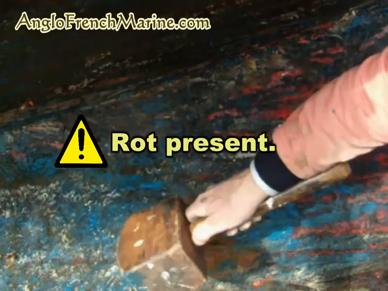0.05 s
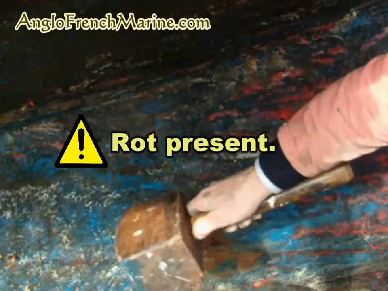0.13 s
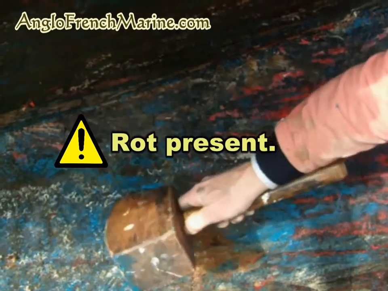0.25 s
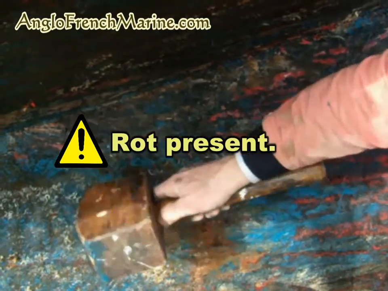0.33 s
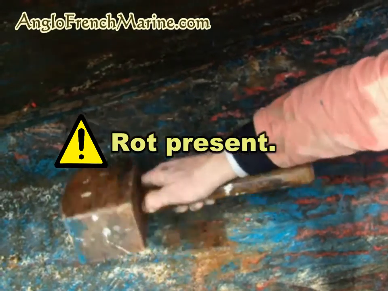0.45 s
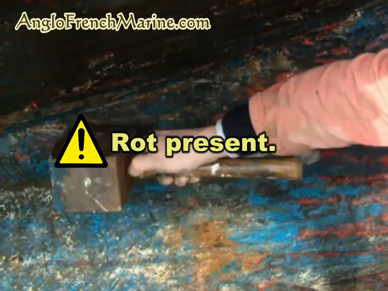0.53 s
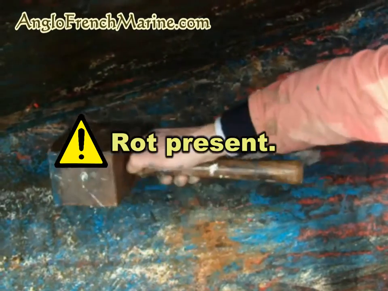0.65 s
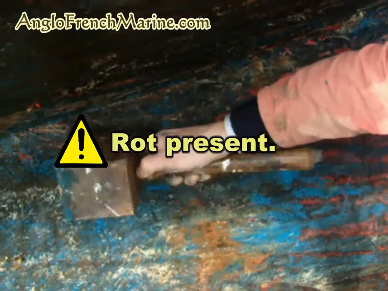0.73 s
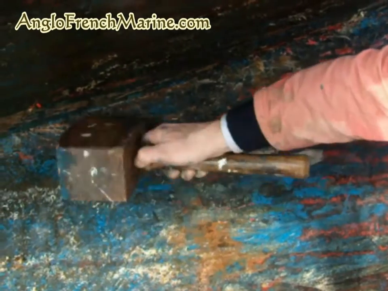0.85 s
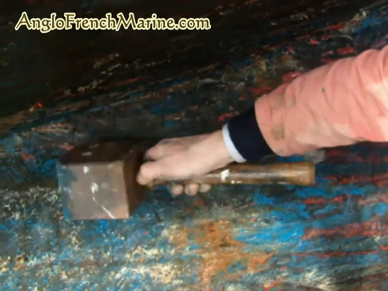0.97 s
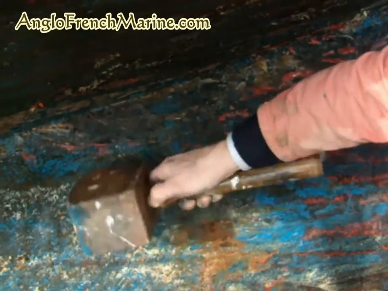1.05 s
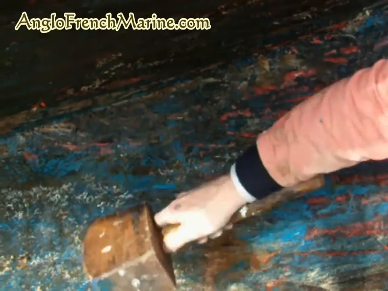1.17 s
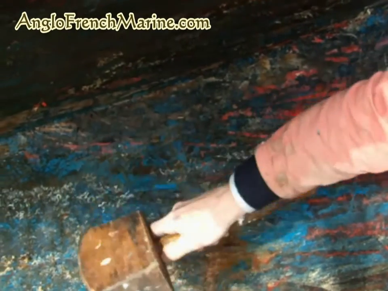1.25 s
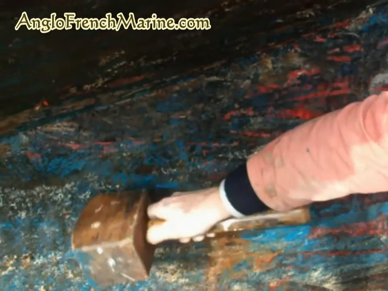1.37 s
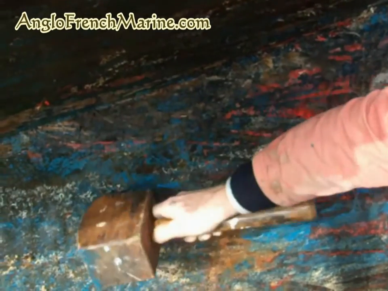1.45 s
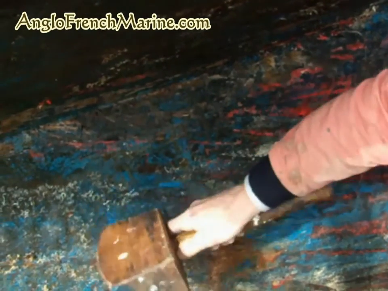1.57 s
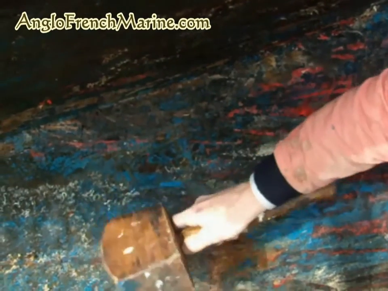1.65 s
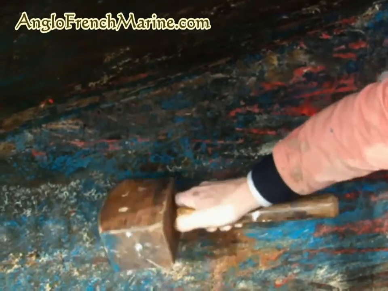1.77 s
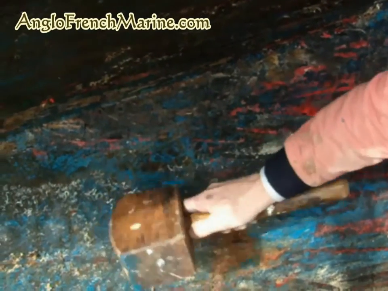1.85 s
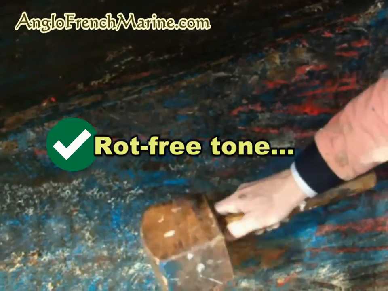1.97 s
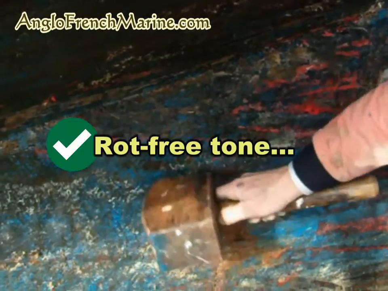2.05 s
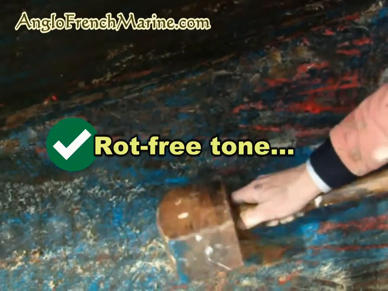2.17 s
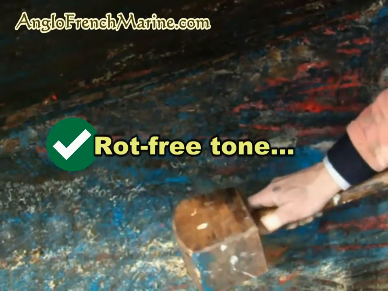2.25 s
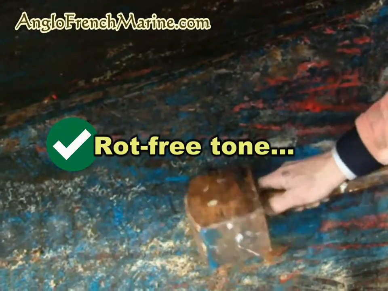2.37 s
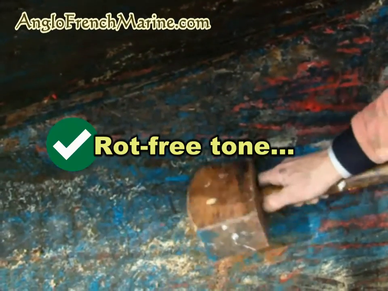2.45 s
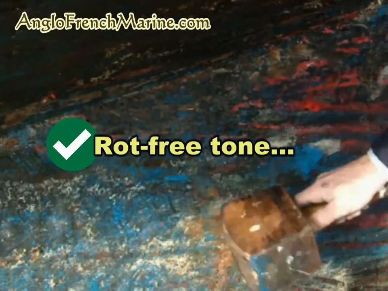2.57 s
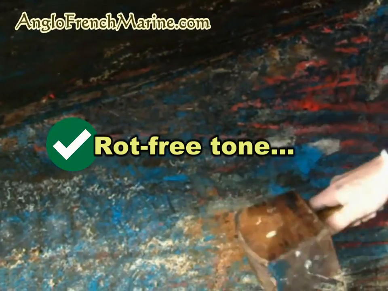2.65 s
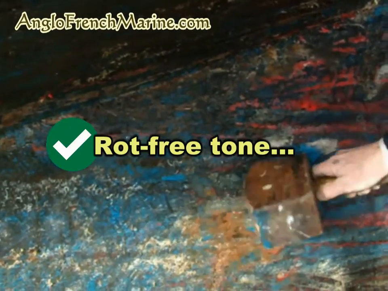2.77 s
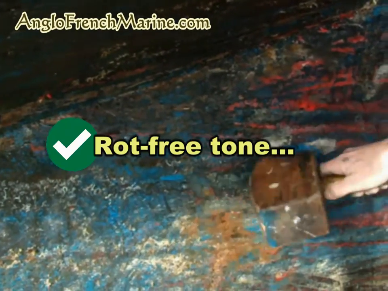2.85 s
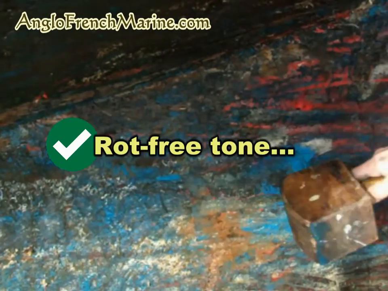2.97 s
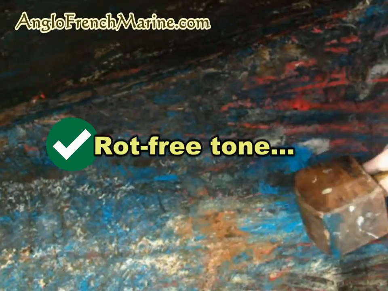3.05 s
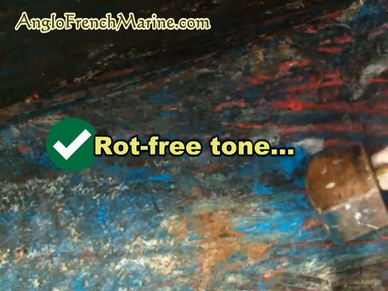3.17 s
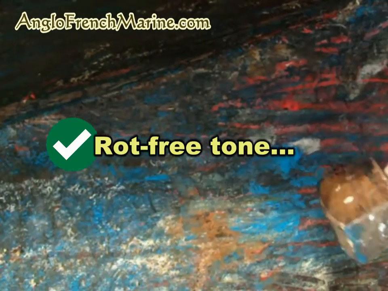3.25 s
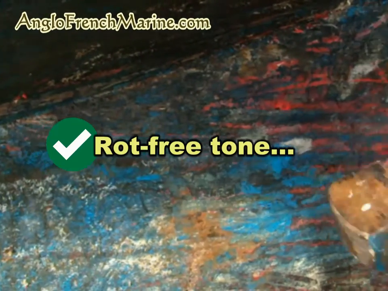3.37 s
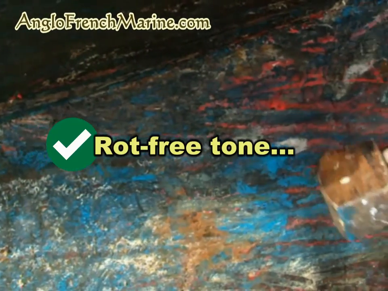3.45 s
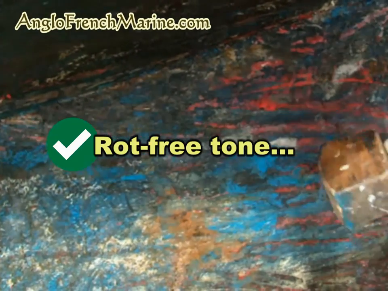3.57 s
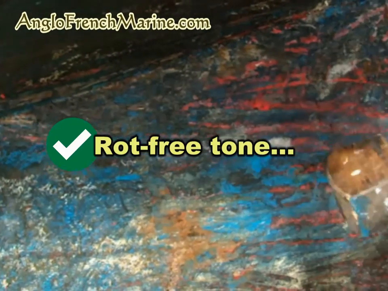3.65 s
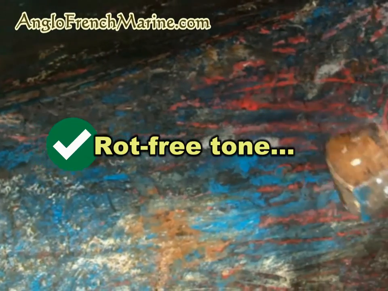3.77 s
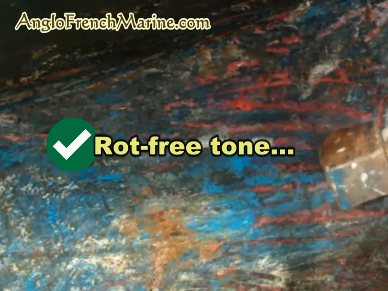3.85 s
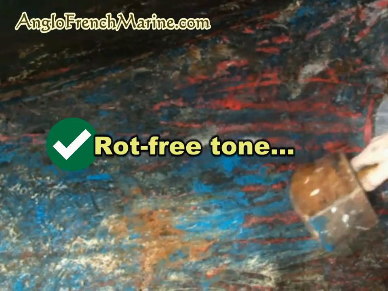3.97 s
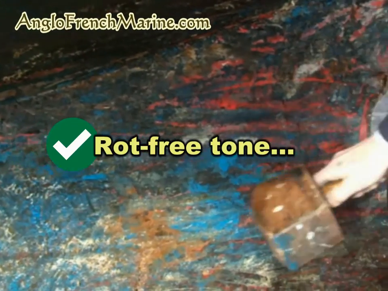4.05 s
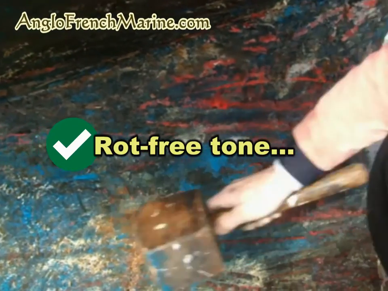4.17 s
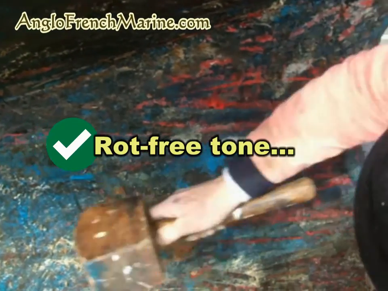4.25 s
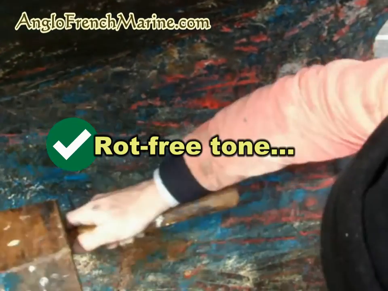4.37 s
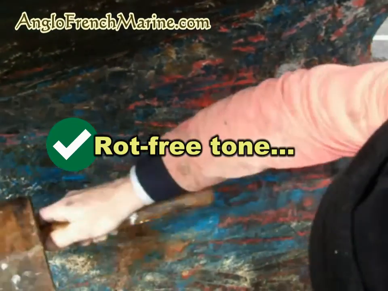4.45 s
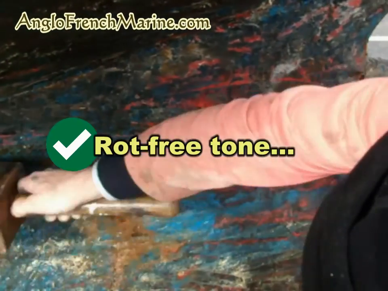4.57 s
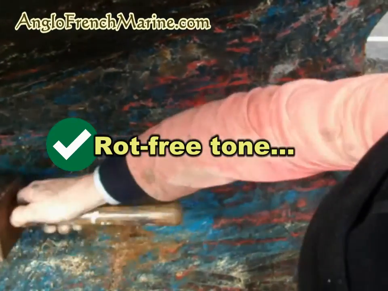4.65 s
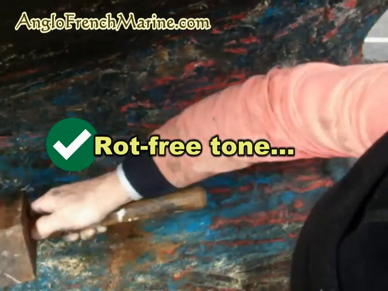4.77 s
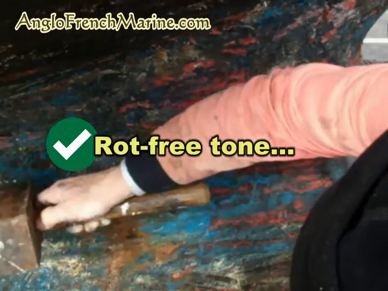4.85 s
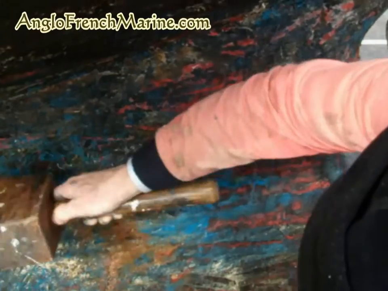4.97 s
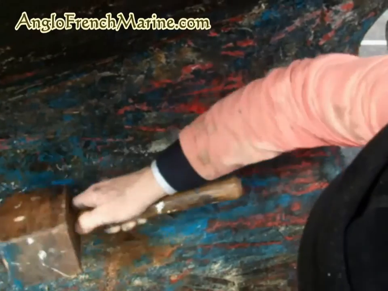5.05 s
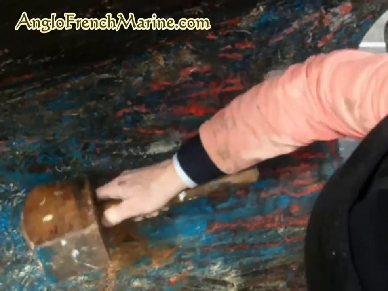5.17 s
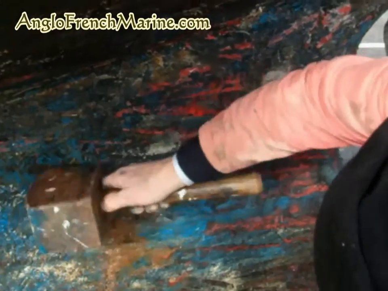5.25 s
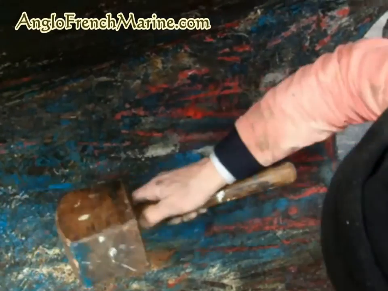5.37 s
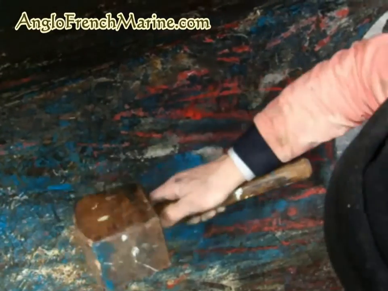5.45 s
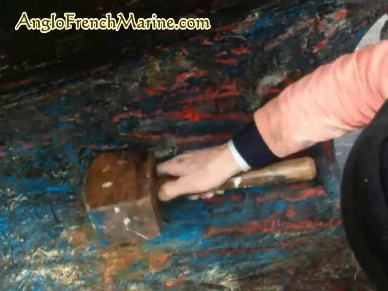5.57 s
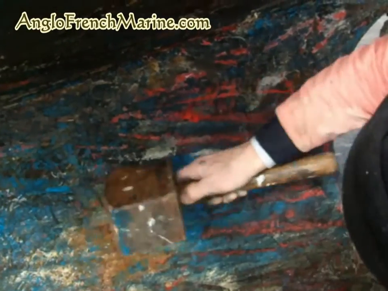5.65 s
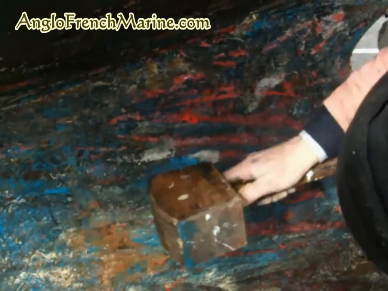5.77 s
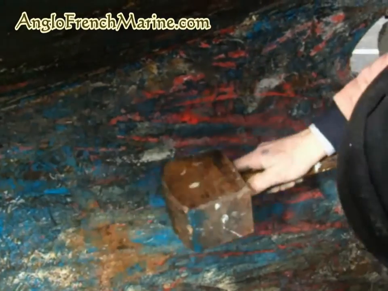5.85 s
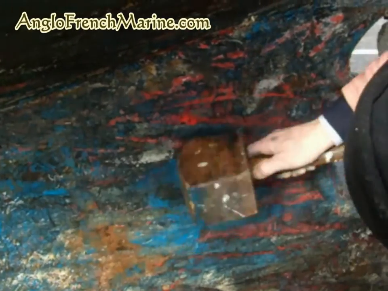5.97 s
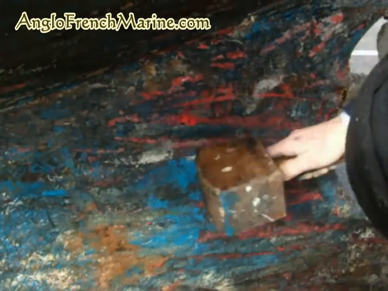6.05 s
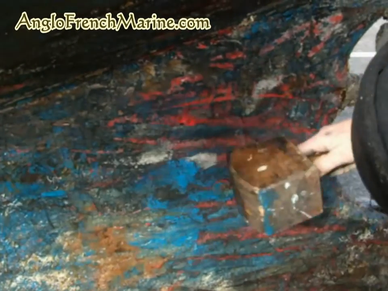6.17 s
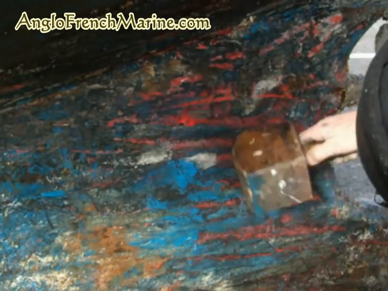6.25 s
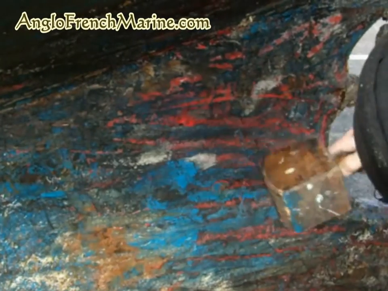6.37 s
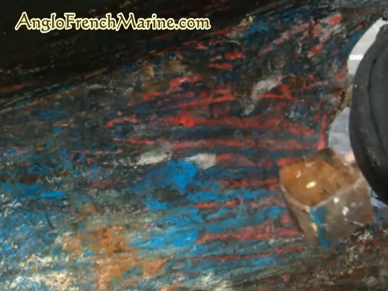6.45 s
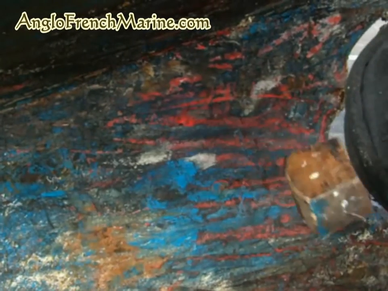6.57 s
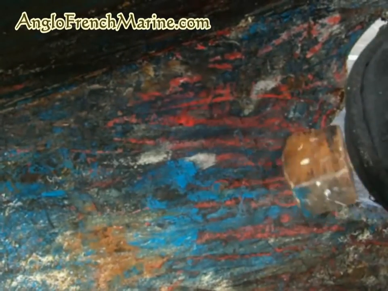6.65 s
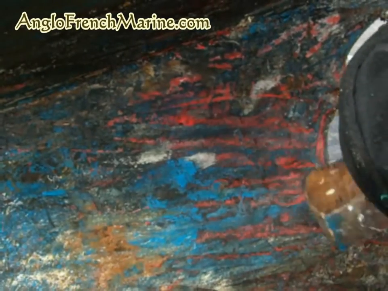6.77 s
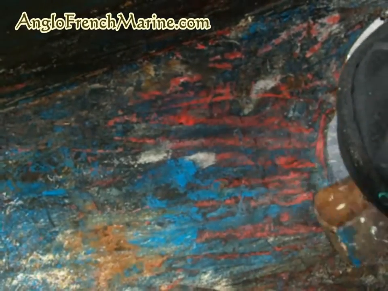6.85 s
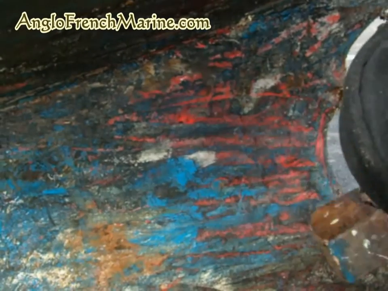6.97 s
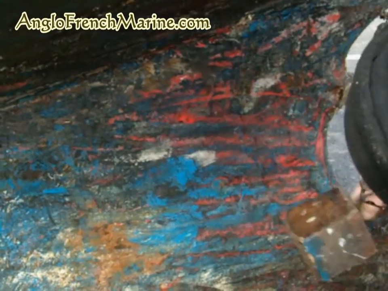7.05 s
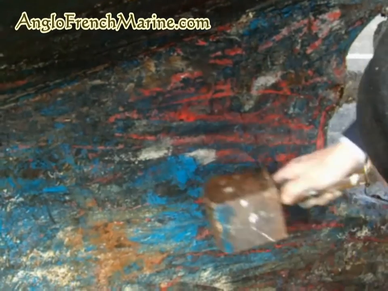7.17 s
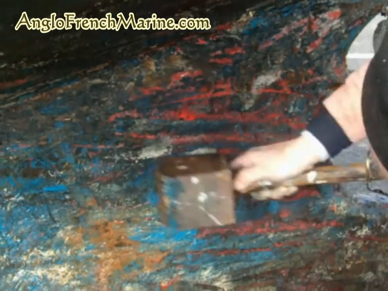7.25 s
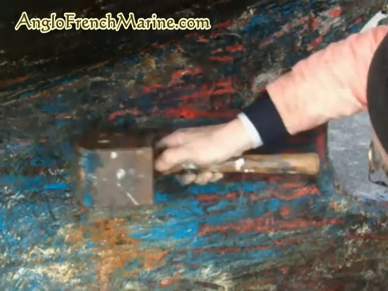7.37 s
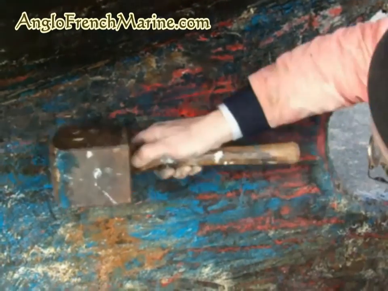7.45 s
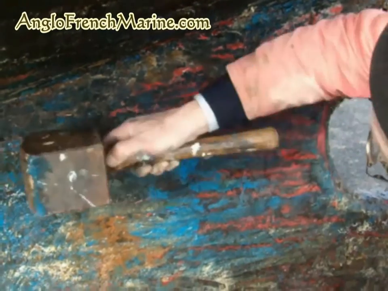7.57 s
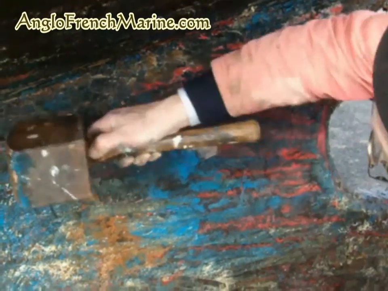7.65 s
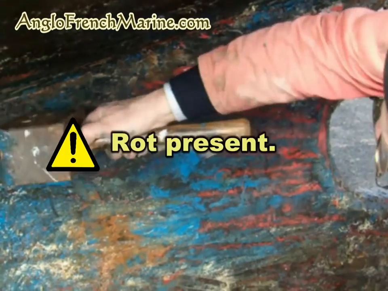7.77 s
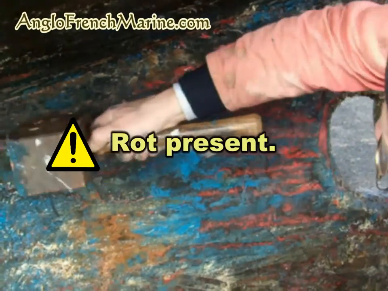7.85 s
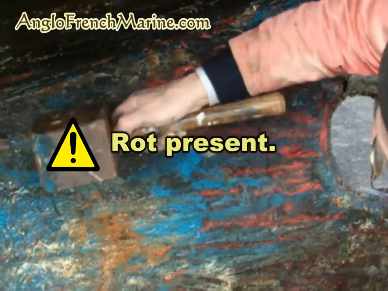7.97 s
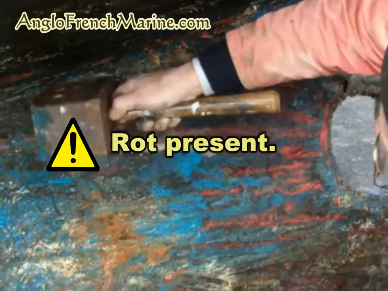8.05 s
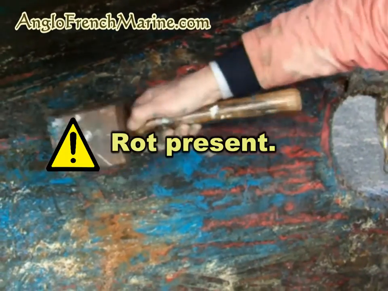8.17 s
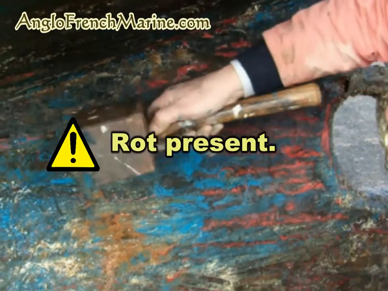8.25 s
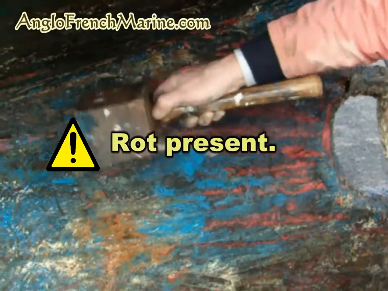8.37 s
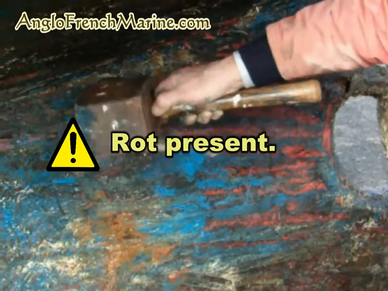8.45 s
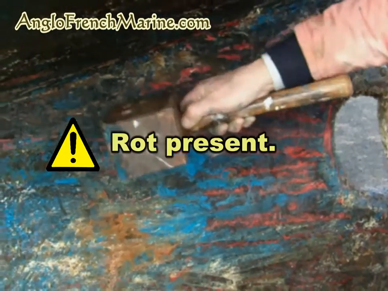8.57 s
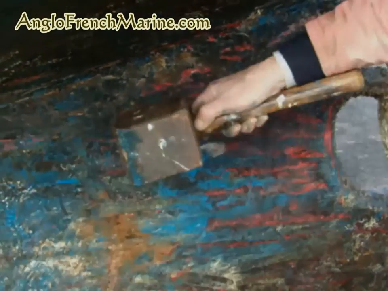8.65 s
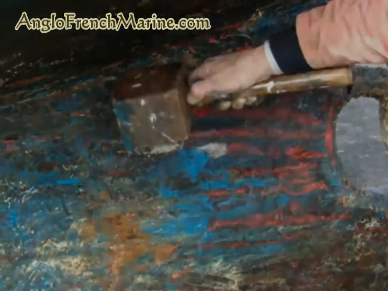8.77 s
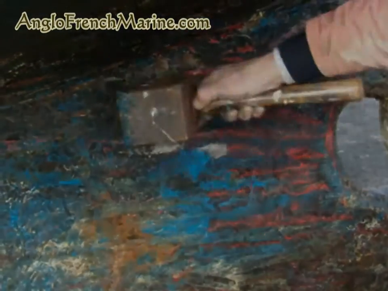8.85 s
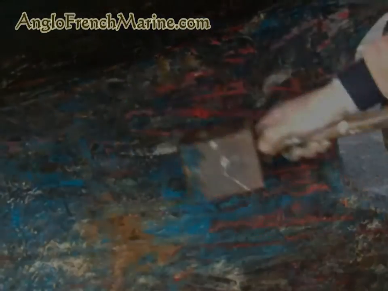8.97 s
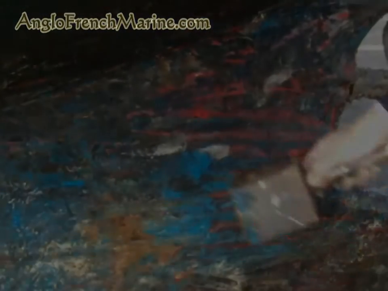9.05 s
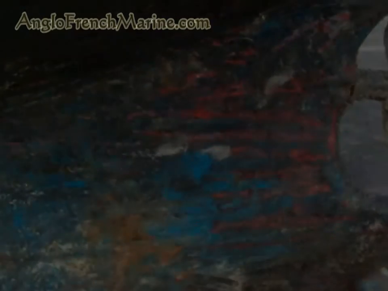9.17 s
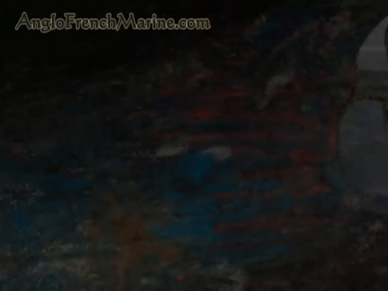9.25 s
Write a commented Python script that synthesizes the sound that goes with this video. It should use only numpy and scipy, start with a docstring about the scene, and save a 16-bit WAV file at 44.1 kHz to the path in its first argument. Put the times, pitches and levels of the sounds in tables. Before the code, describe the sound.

Outdoors, very close, a wooden mallet taps a large wooden hull. Two dull blows open, the first very weak, then hard woody knocks come about three per second, varying in pitch and force, with a softer lower dip near three and a half seconds. After a gap, more bright knocks follow, then a pause with faint sleeve rustle and three weak low thuds. Low rumble and faint hiss lie underneath; it cuts quickly to silence.

```python
"""Mallet on a boat hull

A wooden mallet sounds the planking in a yard: sound wood knocks hard and bright, rotten wood thuds.
Each blow flexes a plank, rings the hull's damped modes and returns off the ground and a far wall.
Paint crackle, a stern hum and sleeve rustles are layered on; hard blows overload the close microphone.
Filtered noise gives a low outdoor rumble and a faint hiss, a gliding sine the distant engine's drone.
The whole sound fades out at the end.
"""
import sys
import numpy as np
from scipy import signal
from scipy.fft import rfft, irfft, next_fast_len
from scipy.io import wavfile
from scipy.ndimage import map_coordinates

SR = 44100
rng = np.random.default_rng(int(sys.argv[2]) if len(sys.argv) > 2 else 0)


def int16_out(signal):
    """Quantize to a 16-bit WAV file."""
    q = np.round(np.clip(np.atleast_2d(signal).T, -1, 1) * 32767)
    wavfile.write(sys.argv[1], SR, q.astype(np.int16))


N = 410571

# mallet blows, rotten planks weak and low: (time [s], relative strength [dB], plank pitch [Hz])
BLOWS = [(0.6081, -16.5, 205), (0.85, -3, 374), (1.4114, 8, 625), (1.7361, 3.5, 481), (2.0798, 12.5, 725.2),
         (2.4299, 11, 644.7), (2.7894, 4.5, 441.6), (3.142, 9, 612), (3.491, -0.5, 327.7), (3.8326, 6, 441),
         (4.5985, 11.5, 760), (4.9289, 5.5, 520), (5.2347, 7.5, 565.5), (5.5785, 3.5, 487.6),
         (5.9243, 2, 452), (6.2752, 11.5, 670.4), (6.6447, 5, 495), (7.7169, -18, 138.6),
         (8.0634, -16, 132.7), (8.4202, -14.5, 134.5)]
# visits of the mallet to the stern timber: (time when nearest [s], time to 1/e of nearness [s])
STERN_VISITS = [(3.402, 0.83), (6.421, 0.78)]
# resonances of the hull: (frequency [Hz], width [Hz], level against the direct knock [dB])
HULL_MODES = [(51, 6.4, 17.5), (135, 46, 5), (174, 2.7, -3.5), (185.1, 10.5, 23.5), (178.8, 5, -10.5),
              (235, 20.7, 7), (280.1, 9.3, 13.5), (319.2, 28, 3), (366, 22.2, 9), (392.2, 13, -0.5),
              (420, 83.5, 10.5), (535.5, 91, 1.5), (608, 56, 4.5), (755.2, 110, 8), (863, 117, 7.5),
              (903, 17, -15), (1285.5, 110, 6)]
# reflections from the ground and the hull's own sides: (delay [s], bass gain [ratio])
NEAR_REFLECTIONS = [(0.00349, -0.51), (0.00814, 0.8), (0.01209, 0.65), (0.0195, 0.23), (0.0255, 0.12),
                    (0.0381, 0.02), (0.04188, 0.041), (0.0523, 0.04)]
# diffuse ring of hull and yard, its colour: (frequency [Hz], relative level [dB])
RING_COLOUR = [(40, 4.5), (100, 4), (170, -2.5), (300, -5.5), (500, -4), (850, -13), (1400, -35.5),
               (6000, -37.5)]
# decay of that ring: (frequency [Hz], time to fall 60 dB [s])
RING_DECAY = [(50, 0.63), (170, 0.92), (300, 0.2), (700, 0.17), (2000, 0.43), (8000, 0.14)]
# colour of the far wall's echo: (frequency [Hz], relative level [dB])
FAR_WALL_COLOUR = [(100, -14), (280, -5.5), (450, -2), (650, -6.5), (1000, -14.5), (1500, -22), (3000, -18)]
# sleeve and hand shifting on the handle: (time of peak [s], time to 1/e [s], level [dB])
RUSTLES = [(4.218, 0.00387, -46), (4.3, .2, -53.5), (5.503, 0.0031, -39), (7.294, 0.0044, -47),
           (7.37, .16, -52), (7.455, 0.0037, -42)]
# swells of the distant engine: (time of peak [s], time to 1/e [s], level [dB])
ENGINE_SWELLS = [(5.425, 0.78, -32.5), (7.437, 0.34, -38.5)]
# colour of the outdoor rumble: (frequency [Hz], relative density [dB per Hz])
RUMBLE_COLOUR = [(8.8, -47.5), (15, -18), (32, -3), (65, -5), (97, -17), (166, -18.5), (199, -21.5),
                 (269, -26), (400, -40), (520, -58), (880, -120)]
# colour of the open air's hiss: (frequency [Hz], relative density [dB per Hz])
HISS_COLOUR = [(180, -24.5), (300, -8), (450, -9.5), (800, -14.5), (1100, -17.5), (1600, -18.5),
               (2300, -19), (3200, -16), (4500, -21), (5700, -26.5), (7000, -42), (12000, -65)]
# treble response of the input, relative to its first row: (frequency [Hz], level [dB])
INPUT_TREBLE = [(2000, 7), (3000, 0), (4200, -1.5), (7200, -1), (8000, -38), (9000, -6), (10500, -1),
                (13000, -25), (15500, -20)]
# closing fade: (time [s], level [dB])
CLOSING_FADE = [(8.54, 0), (8.56, -3), (8.578, -26), (8.62, -48), (8.8, -100)]

CONTACT_RATIO = 2.11  # contact hardness over plank pitch: firm wood throws the mallet back sooner
STERN_HARDENING = 0.82  # extra contact hardness over the stern timber, as a share
PLANK_DAMPING = 0.75  # width of a plank's resonance over its pitch
STERN_DAMPING = 0.39  # extra damping where the plank is fastened to the stern timber
STERN_MODE_HZ, STERN_MODE_WIDTH_HZ, STERN_MODE_DB = 212.8, 20, 13  # planking resonance at the stern
HUM_DB, HUM_FALL_DB = -25.5, 26  # start of the hum for a blow beside the stern timber; loss far from it
CRACKLE_DB, CRACKLE_GROWTH = -17, 0.74  # crackle under a 0 dB blow; dB more per dB of strength
ECHO_S = 0.22  # delay of the far wall's echo
ECHO_AFT_DB = 4.5  # that echo grows as the hull stops screening it near the stern
ENGINE_HZ, ENGINE_REV_S, ENGINE_RISE_HZ_PER_S = 52.3, 3.5, 2.2  # first pitch; speed-up start and rate
RUMBLE_DB, HISS_DB = -36, -48.5  # background levels, before their slow wobble
RUMBLE_RISE_DB, RUMBLE_RISE_S = 4.5, 1  # the rumble builds up by this much at the start
TOP_HZ = 15500  # nothing passes the input above this


def mallet(scatter_hz=131):
    """Each blow shakes the hull and arrives directly, off nearby surfaces and off a far wall."""
    f = np.fft.rfftfreq(SR, 1 / SR)
    hull = 1 + sum(amp(db) * resonance(f, hz, width) for hz, width, db in HULL_MODES)
    stern_mode = amp(STERN_MODE_DB) * resonance(f, STERN_MODE_HZ, STERN_MODE_WIDTH_HZ)
    # rough surfaces return mostly the bass
    reflections = sum(gain * delay(f, s) for s, gain in NEAR_REFLECTIONS)
    near = 1 + reflections / (1 + 1j * f / scatter_hz)
    out = np.zeros(N + SR)
    for s, strength_db, plank_hz in BLOWS:
        # nearness to the stern timber, 0-1
        aft = sum(swell(s, nearest, stay) for nearest, stay in STERN_VISITS)
        contact_hz = CONTACT_RATIO * plank_hz * (1 + STERN_HARDENING * aft)
        width_hz = plank_hz * (PLANK_DAMPING + STERN_DAMPING * aft)
        echo = 1 + amp(ECHO_AFT_DB * aft) * far_wall(f)
        paths = (hull + aft * stern_mode) * near * echo + diffuse_ring()
        knock = amp(strength_db) * blow(f, plank_hz, width_hz, contact_hz) * paths
        paint = amp(CRACKLE_DB + CRACKLE_GROWTH * strength_db) * crackle(f)
        start = round(s * SR)
        out[start:start + SR] += irfft(knock + paint, SR) + stern_hum(aft)
    return out[:N]


def blow(f, plank_hz, plank_width, contact_hz, bend_hz=104, bend_width=99,
         overtone=2.7, overtone_width=45, overtone_db=-10, loss_hz=600):
    """Spectrum of one blow: the plank flexes for a few cycles, lower and softer where it is rotten."""
    first_mode = resonance(f, plank_hz, plank_width)
    # a slack, rotten plank also bends in its second mode; a stiff one hardly does
    second_hz = overtone * plank_hz
    second_gain = amp(overtone_db) / (1 + (second_hz / loss_hz) ** 4)
    flex = first_mode + second_gain * resonance(f, second_hz, overtone_width)
    # long bending waves travel slowly, so the bass arrives last
    dispersion = 1 - 2 * resonance(f, bend_hz, bend_width)
    return SR / plank_hz * flex * contact(f, contact_hz) * dispersion


def contact(f, hardness_hz, cutoff=1.81, damping=0.94):
    """Spectrum of the mallet's push: soft wood prolongs it, which takes away the treble."""
    u = f / (cutoff * hardness_hz)
    return 1 / (1 + 1j * f / hardness_hz) ** 2 / (1 - u * u + 1j * damping * u)


def diffuse_ring(rise_s=0.0017):
    """Spectrum of a fresh one-second noise tail of hull and yard, each band decaying at its own rate."""
    hz, t, bands = signal.stft(rng.standard_normal(SR), SR, nperseg=512)
    t60 = along(RING_DECAY, hz)[:, None]
    envelope = amp(-60 * t / t60) * (1 - np.exp(-t / rise_s))
    # even out the energy of long and short decays before colouring
    energy = np.sqrt(t60 * SR / np.log(10 ** 6))
    envelope *= amp(along(RING_COLOUR, hz))[:, None] / energy
    tail = signal.istft(bands * envelope, SR, nperseg=512)[1]
    return rfft(tail[:SR])


def far_wall(f, spread_s=0.0073, echo_db=-42):
    """Spectrum of the faint echo from a distant, uneven wall, which smears it in time."""
    t = np.arange(SR) / SR
    scatter = rng.standard_normal(SR) * swell(t, ECHO_S, spread_s)
    return amp(echo_db + along(FAR_WALL_COLOUR, f)) * rfft(scatter / np.linalg.norm(scatter))


def crackle(f, level_db=9, rise_s=0.0008, t60=0.071, bright_hz=3700, damping=0.97, top_hz=6500):
    """Spectrum of old paint and fibres crushed by the mallet: it swells with the pressure and dies away."""
    t = np.arange(SR) / SR
    burst = rng.standard_normal(SR) * amp(level_db - 60 * t / t60) * (1 - np.exp(-t / rise_s))
    u, v = f / bright_hz, f / top_hz
    bright = 1 / (1 - u * u + 1j * damping * u)
    rolloff = 1 / (1 - v * v + 1j * np.sqrt(2) * v)
    return rfft(burst) * bright * rolloff


def stern_hum(aft, hum_hz=160, t60=1.6):
    """The low hum that a blow leaves in the stern timber, louder the further aft (0-1) it lands."""
    t = np.arange(SR) / SR
    level_db = HUM_DB - HUM_FALL_DB * (1 - aft) - 60 * t / t60
    return amp(level_db) * np.sin(2 * np.pi * hum_hz * t)


def sleeve(cloth_hz=3200, cloth_width=2500, grain_db=4):
    """Faint rustles as sleeve and hand shift: band-limited noise with a fast, grainy level."""
    cloth = filtered(rng.standard_normal(N), lambda hz: resonance(hz, cloth_hz, cloth_width) ** 2)
    return swells(RUSTLES) * unit(cloth * amp(grain_db * wobble(120)))


def engine(waver_hz=0.5, flutter_db=0.9):
    """The wavering drone of a distant engine that slowly speeds up: one gliding sine."""
    t = np.arange(N) / SR
    rise_hz = ENGINE_RISE_HZ_PER_S * np.maximum(t - ENGINE_REV_S, 0)
    pitch_hz = ENGINE_HZ + rise_hz + waver_hz * wobble(2.4)
    drone = unit(np.sin(2 * np.pi * np.cumsum(pitch_hz) / SR))
    return swells(ENGINE_SWELLS) * amp(flutter_db * wobble(0.98)) * drone


def yard():
    """Outdoor rumble and hiss: two coloured noises whose levels wobble a little."""
    t = np.arange(N) / SR
    rumble_db = RUMBLE_DB - RUMBLE_RISE_DB * np.maximum(1 - t / RUMBLE_RISE_S, 0)
    rumble = amp(rumble_db + 0.42 * wobble(0.67)) * noise(RUMBLE_COLOUR, side_db=-38.5)
    hiss = amp(HISS_DB + 0.21 * wobble(7.1)) * noise(HISS_COLOUR, side_db=-32.5)
    return rumble + hiss


def noise(spectrum, side_db):
    """Coloured stereo noise of rms 1, nearly alike in both channels."""
    mid, side = filtered(rng.standard_normal((2, N)), lambda hz: amp(along(spectrum, hz)))
    side = amp(side_db) * side
    return unit(np.array([mid + side, mid - side]))


def amp(db):
    """Decibels to gain."""
    return 10 ** (np.asarray(db) / 20)


def unit(x):
    """Scale to rms 1."""
    return x / np.sqrt(np.mean(x ** 2) + 1e-20)


def along(points, hz):
    """Read (Hz, value) points on a log frequency axis."""
    f, v = np.transpose(points)
    return np.interp(np.log(hz + 1), np.log(f + 1), v)


def wobble(rate):
    """A smooth random curve, rate knots a second."""
    knots = rng.standard_normal(int(N * rate / SR) + 4)
    return map_coordinates(knots, [np.arange(N) * rate / SR])


def swell(t, s, length):
    """A smooth rise and fall that reaches 1 at time s."""
    return np.exp(-((t - s) / length) ** 2)


def swells(rows):
    """Gain curve that sums the swells of a (time, length, dB) table."""
    t = np.arange(N) / SR
    return sum(amp(db) * swell(t, s, length) for s, length, db in rows)


def filtered(x, response):
    """x times a complex response of frequency."""
    m = next_fast_len(N + SR // 2)
    return irfft(rfft(x, m) * response(np.fft.rfftfreq(m, 1 / SR)), m)[..., :N]


def resonance(f, hz, width):
    """Response of one damped mode."""
    return 1j * f * width / (hz * hz - f * f + 1j * f * width)


def delay(f, s):
    """Response of a path that takes s seconds."""
    return np.exp(-2j * np.pi * f * s)


def scene(lag_s=0.00001):
    """The mallet works slightly to the right, so that side hears it a little sooner."""
    right = mallet()
    left = filtered(right, lambda hz: delay(hz, lag_s))
    return np.array([left, right]) + sleeve() + yard() + engine()


def record(dry, ceiling=0.96, tilt_db=0.95, tilt_hz=700):
    """The input overloads and flattens the peaks; the sound fades out and the treble is shaped."""
    clipped = dry / (1 + np.abs(dry / ceiling) ** 8) ** (1 / 8)
    fade_db = np.interp(np.arange(N) / SR, *np.transpose(CLOSING_FADE))

    def treble(hz):
        # the left channel loses a little more treble
        sides_db = np.array([[-1], [0]]) * tilt_db * hz / (hz + tilt_hz)
        shape_db = along(INPUT_TREBLE, hz) - INPUT_TREBLE[0][1]
        return (hz < TOP_HZ) * amp(shape_db + sides_db)

    return filtered(clipped * amp(fade_db), treble)


dry = scene()
out = record(dry)
int16_out(out)
```